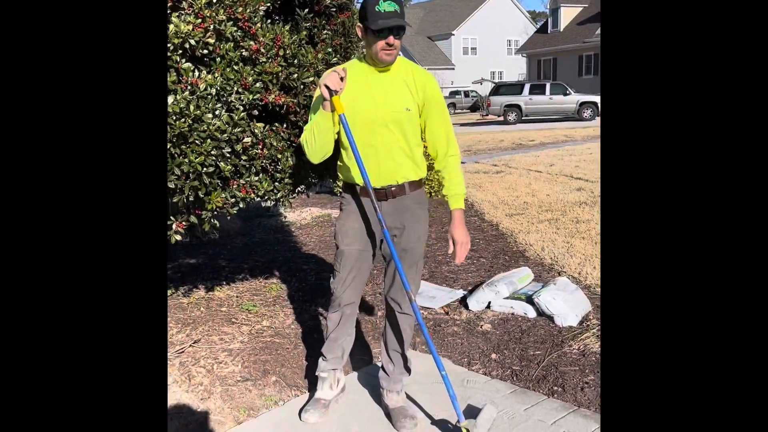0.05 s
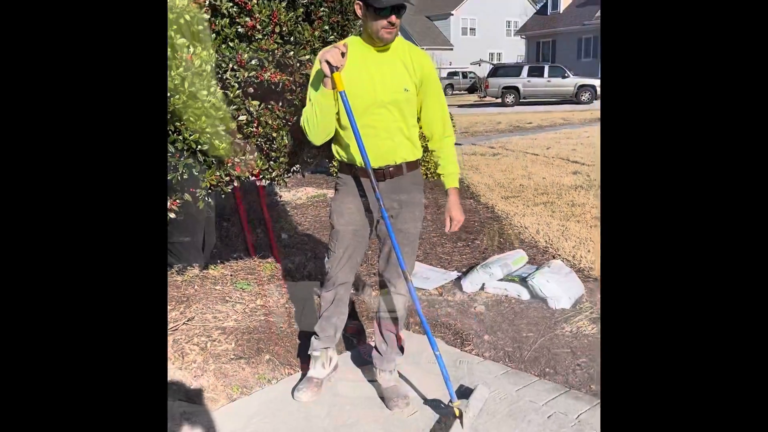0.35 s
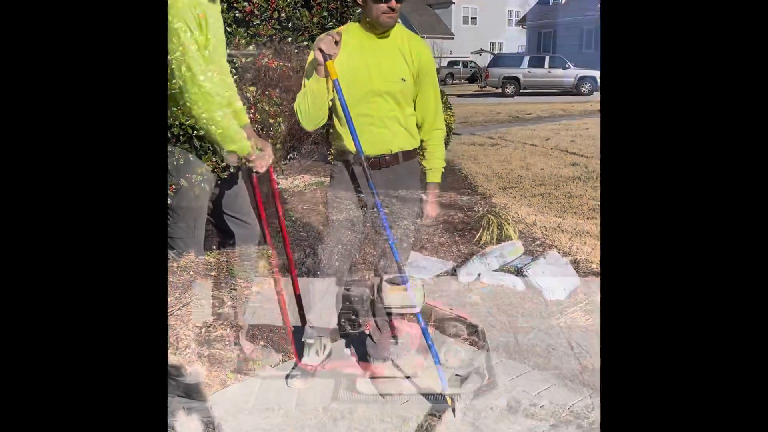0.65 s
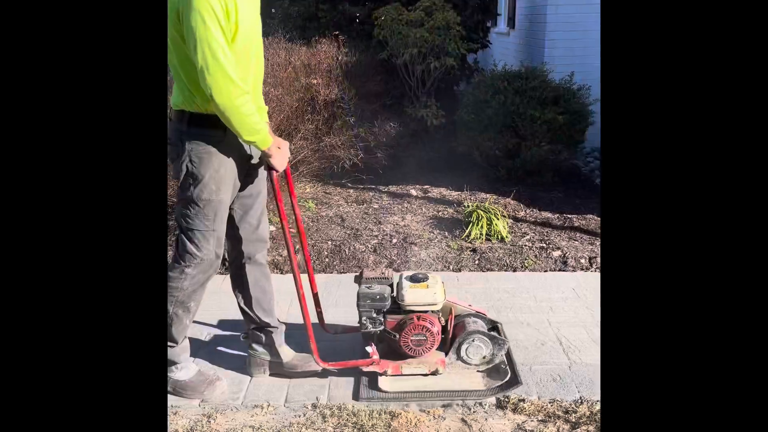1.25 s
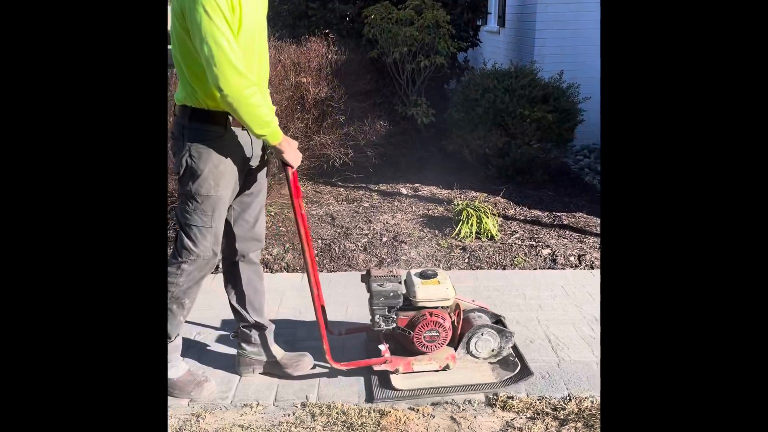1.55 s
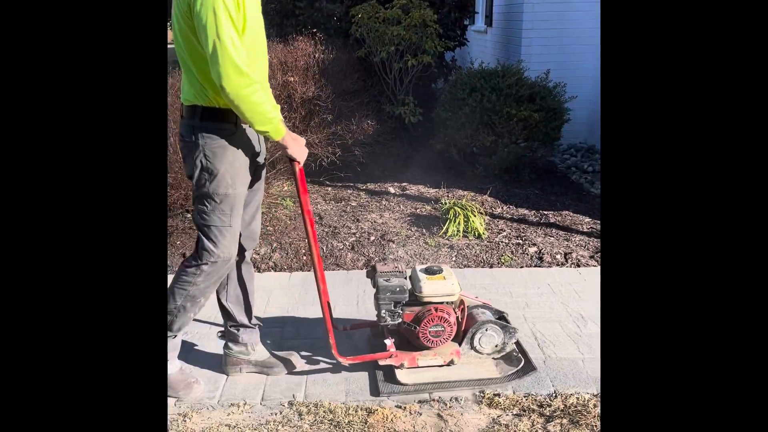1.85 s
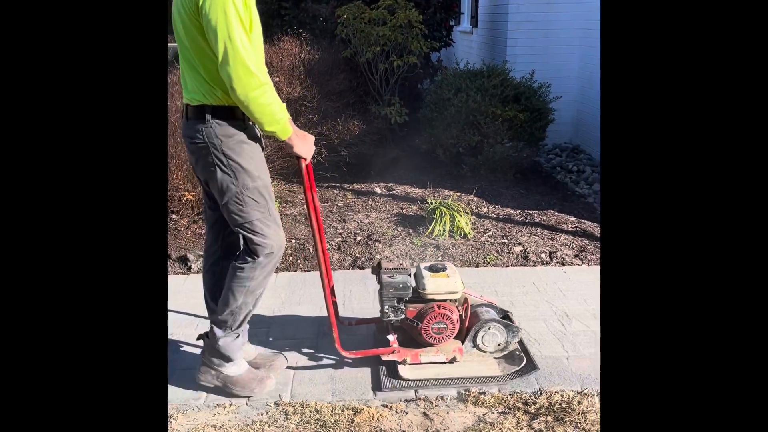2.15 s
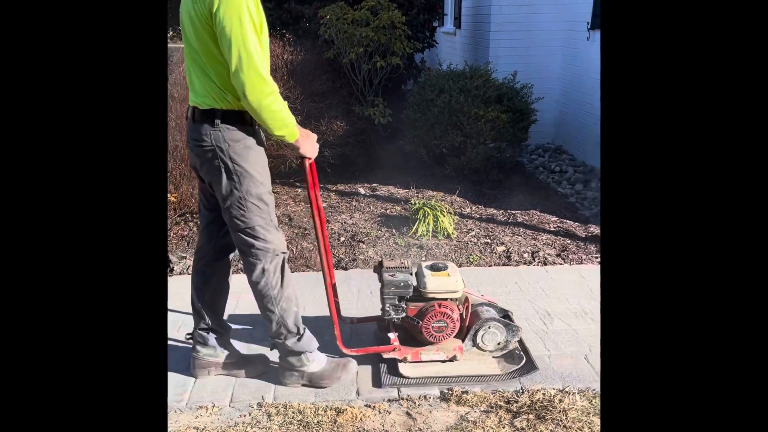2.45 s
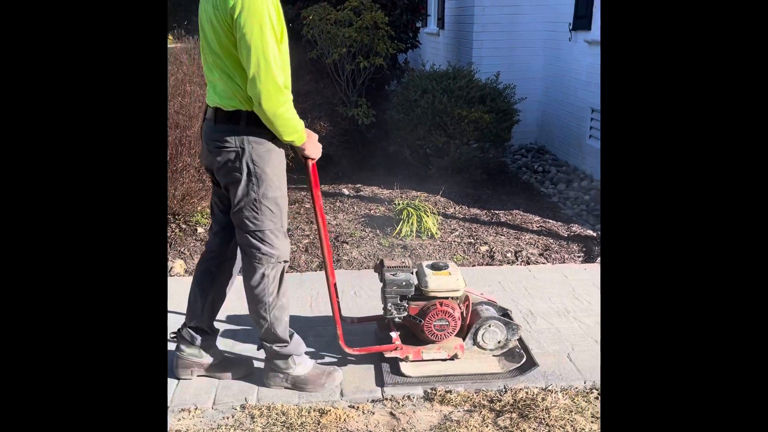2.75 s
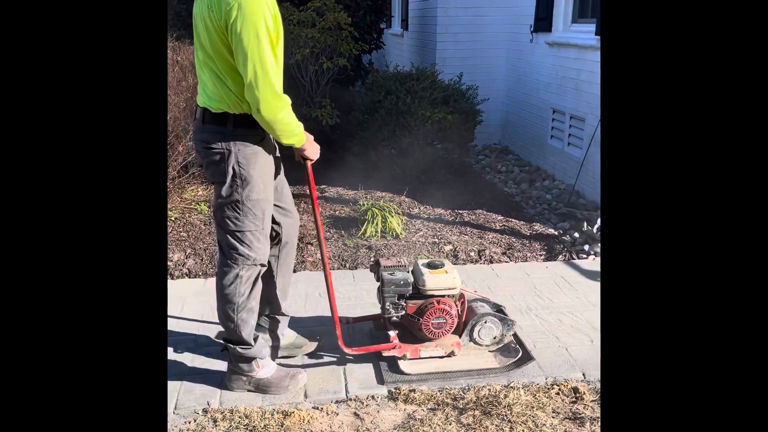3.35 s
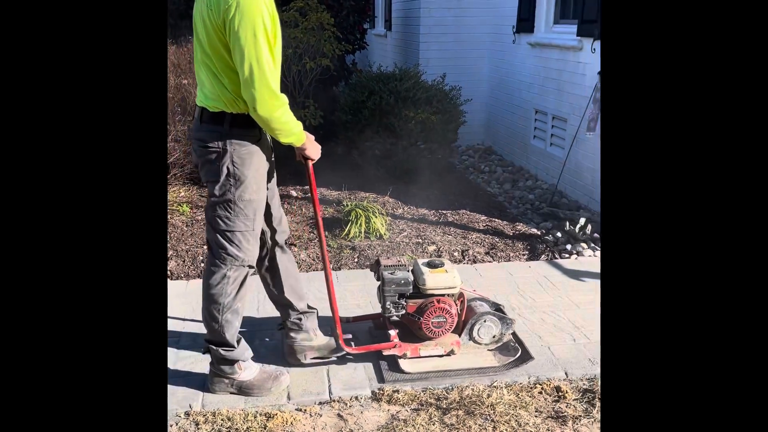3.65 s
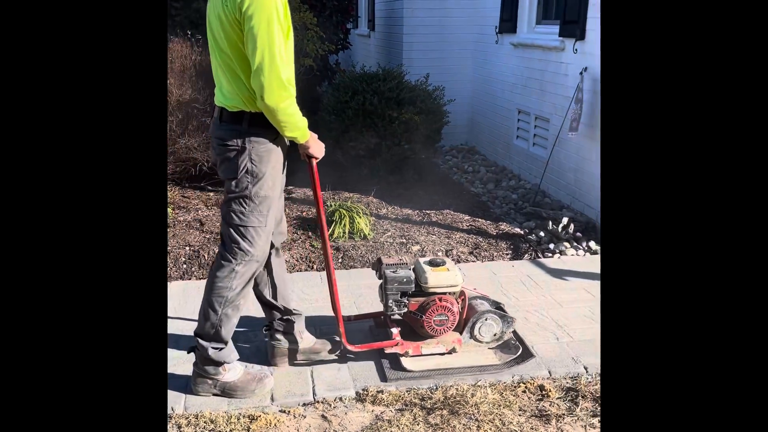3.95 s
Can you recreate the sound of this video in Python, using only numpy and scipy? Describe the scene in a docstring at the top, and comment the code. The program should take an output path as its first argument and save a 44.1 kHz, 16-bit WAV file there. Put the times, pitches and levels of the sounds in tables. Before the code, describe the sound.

A plate compactor pounds paving stones close to the microphone, swelling out of a brief, quiet outdoor rumble. The engine throbs and ticks under a fast, gritty clatter, with occasional knocks, cracking stones and growls over rough patches.

```python
"""A quiet garden rumbles, with a faint double tick and two soft bumps of air. From 0.2 to 1 s it fades
into a petrol plate compactor on paving, its one-cylinder four-stroke engine driving the plate by a belt.
The plate hums, rocks and slaps the stones in a pattern that repeats every two turns of its weight;
sand hisses under it and the engine ticks. Near 1 s stones crack and one edge knocks. It knocks again
near 1.8 s, growls over rough patches until 2.8 s, and knocks and cracks stones once more near 3.5 s."""
import sys
import numpy as np
from scipy import signal
from scipy.fft import rfft, irfft
from scipy.io import wavfile

SR = 44100
rng = np.random.default_rng(int(sys.argv[2]) if len(sys.argv) > 2 else 0)


def generate_wav(signal):
    """Clip the signal to [-1, 1] and save it as 16-bit WAV at the path in sys.argv[1]."""
    frames = np.transpose(np.atleast_2d(signal))
    scaled = np.clip(frames, -1, 1) * 32767
    pcm = np.round(scaled).astype(np.int16)
    wavfile.write(sys.argv[1], SR, pcm)


N = 176400
T = np.arange(N) / SR

# the garden's rumble (f/Hz, level/dB)
GARDEN_SPECTRUM = [(15, -24), (25, -5), (49, -4), (101, -2), (276, -14.5), (555, -19), (648, -23),
                   (797, -21.5), (1200, -33), (12000, -65.5), (15600, -101), (22000, -120)]
# low bumps of air (t/s, level/dB)
AIR_BUMPS = [(.278, -36), (.325, -36.5)]
# faint double tick in the garden (t/s, level/dB)
GARDEN_TICKS = [(.057, -53), (.069, -56)]
# bright tick shared by garden, valves and grit (f/Hz, level/dB)
TICK_SPECTRUM = [(800, -24), (1800, 9.5), (3200, -3), (4500, -2.5), (5600, -4.5), (8000, -11.5),
                 (13000, -9)]

# rocking rate; one cycle is two turns of the eccentric weight (t/s, f/Hz)
ROCKING_RATE = [(0.4, 40.2), (0.59, 40.0), (0.67, 39.6), (1.0, 39.4), (1.2, 39.6), (1.27, 40.1),
                (1.42, 40.0), (1.95, 40.1), (2.08, 39.8), (2.7, 39.4), (2.99, 40.1), (3.19, 40.1),
                (3.3, 39.8), (3.45, 39.7), (4.0, 40.2)]
# exhaust tones (multiple of the firing rate, level/dB)
EXHAUST_TONES = [(1, -69), (2, -40), (3, -39.5), (4, -49.5), (5, -31.5), (6, -31.5), (7, -36.5), (8, -40),
                 (9, -40), (10, -44.5), (11, -47.5), (12, -42.5), (14, -43)]
# swells and dips of single exhaust tones (multiple, t/s, half length/s, gain/dB)
EXHAUST_SWELLS = [(6, 0.6, 0.52, -8), (6, 3.2, .8, 2.5), (3, 0.6, .3, -6)]
# plate tones (multiple of the rocking rate, level/dB against its fader)
PLATE_TONES = [(1, -29), (2, -2), (3, 0), (4, -1), (5, 1), (6, 2.5), (7, -1.5), (8, -12.5), (9, -2.5),
               (10, -7), (11, -10.5), (12, -9), (13, -14), (14, -9.5), (15, -16), (16, -11.5), (17, -6.5),
               (18, -7), (19, -10), (20, -11), (22, -19)]
# hum faders; odd multiples grow with rocking (t/s, shaft tone/dB, fourfolds/dB, other evens/dB, odds/dB)
HUM_FADERS = [(.6, -40, -35.5, -38, -34.5), (1.02, -33, -31, -36, -36), (1.35, -34, -27, -39, -37.5),
              (1.85, -36, -28, -34, -46), (2.1, -34, -27, -31.5, -36.5), (2.28, -33, -24, -27.5, -37),
              (2.47, -27.5, -24.5, -29, -32.5), (2.7, -33, -25.5, -33.5, -31), (2.95, -33, -25.5, -33, -36),
              (3.12, -27, -25.5, -30.5, -31.5), (3.42, -26, -25.5, -29.5, -29),
              (3.62, -29, -23, -29, -31.5), (3.8, -27, -23.5, -28.5, -39), (4, -27, -23.5, -26.5, -40)]
# single plate tones swell or sink as the ground changes (multiple, t/s, half length/s, gain/dB)
PLATE_SWELLS = [(7, 3.15, 0.5, 5), (8, 1.8, 0.26, 7.5), (9, 2.7, 0.58, 5), (3, 1.1, 0.58, 3.5),
                (12, 0.66, 0.44, 10), (12, 1.94, 0.35, 4), (12, 2.46, 0.14, -19), (14, 1.84, 0.24, 12)]

# stones cracking under the plate (t/s, level/dB)
STONE_CRACKS = [(.868, -26), (.882, -27), (.907, -26), (.945, -21), (.972, -33), (1.024, -24), (1.075, -31),
                (2.477, -22), (3.457, -24), (3.533, -22), (3.577, -21), (3.628, -27), (3.653, -20.5),
                (3.703, -25), (3.729, -22), (3.754, -22)]
# their sharp snap (f/Hz, level/dB)
CRACK_SPECTRUM = [(800, -15), (1800, 5), (3000, 6.5), (4500, 1), (5600, -3), (8000, -5), (13000, -10)]
# growls on rough patches (t/s, half length/s, resonance f/Hz, level/dB)
ROUGH_PATCHES = [(1.887, .07, 580, -32.5), (2.12, 0.097, 665, -29), (2.663, .12, 600, -25.5),
                 (2.743, 0.051, 705, -25)]
# spells of edge knocking (peak t/s, half length/s, level/dB, decay/s)
KNOCK_SPELLS = [(1.011, .18, -32.5, .002), (1.835, .16, -33, .0015), (3.4575, .14, -29, .0008)]
# the edge's hard knock (f/Hz, level/dB)
KNOCK_SPECTRUM = [(300, -11.5), (900, -3), (1600, 6), (2200, -8.5), (3300, -7.5), (4500, -19), (8000, -40),
                  (13000, -40)]
# hiss of crushed sand (f/Hz, level/dB)
SAND_SPECTRUM = [(500, -4.5), (1800, 9.5), (3200, 0.5), (4200, -1.5), (5600, -2), (6800, -6.5), (8000, 3),
                 (10500, -1.5), (13000, -31)]
# modes of the plate and frame (f/Hz, width/Hz, level/dB)
STEEL_MODES = [(1708, 14, -37), (2236, 140, -47.5), (3272, 110, -47.5)]
# fader on those modes (t/s, gain/dB)
STEEL_FADER = [(.8, -4.5), (1.7, -2), (2.05, 1.5), (3.0, 0), (4.0, 1.5)]
# where the plate meets the paving (place in the cycle 0-1, thud and ring/dB, clack and crush/dB)
CONTACTS = [(0, 0.5, -5.5), (.07, 1, -7.5), (.15, -3, -4), (.33, -14.5, -3.5), (.52, 2.5, -2.5),
            (.60, -1.5, -2), (.72, -8.5, -4.5)]
# faders on the three layers of a slap (t/s, thud/dB, ring/dB, clack/dB)
SLAP_FADERS = [(0.76, -32.5, -32.5, -31), (0.94, -29, -27, -27), (1.2, -28, -26, -26.5),
               (1.52, -29.5, -30.5, -30.5), (1.66, -29, -27.5, -26), (1.9, -33, -25, -23.5),
               (2.0, -33, -30, -28), (2.13, -37, -22, -25), (2.33, -34, -30, -30.5),
               (2.45, -37, -24, -27.5), (2.56, -27.5, -26, -27), (2.76, -30.5, -24.5, -25),
               (2.95, -28, -28.5, -28), (3.12, -25.5, -26, -26.5), (3.45, -26, -26.5, -26.5),
               (3.6, -28, -27, -23.5), (3.72, -32, -26, -26), (4.0, -30, -24, -26.5)]
# low body of a slap (f/Hz, level/dB)
THUD_SPECTRUM = [(25, -46), (60, -18), (110, -6.5), (170, 0.5), (300, -3), (430, 0), (560, -14.5),
                 (900, -35)]
# its midrange ring (f/Hz, level/dB)
RING_SPECTRUM = [(300, -27), (450, -3.5), (600, 3), (760, -1.5), (900, -10.5), (1300, -32)]
# its stony attack (f/Hz, level/dB)
CLACK_SPECTRUM = [(500, -15.5), (900, 0), (1300, 4), (1550, -1), (1730, 0), (2050, -5.5), (2700, -9),
                  (3300, -16), (4100, -22), (5500, -31.5), (8000, -31), (13000, -63)]

# tone colour of both microphone ports (f/Hz, gain/dB)
PORT_EQ = [(20, 0), (7500, -0.5), (9000, -20.5), (10000, 14.5), (10800, 8), (11800, 0), (13000, -16)]
# how far left leads right (f/Hz, phase/rad)
LEFT_LEAD = [(20, 0), (1650, 0), (2100, 0.34), (2650, 2.02), (3200, 0.22), (3900, 0.15), (4800, 3),
             (5500, 6.5), (6100, 7.5), (7500, 8), (9000, 8.5), (10700, 10.5), (11900, 13)]
# left over right (f/Hz, level/dB)
LEFT_TILT = [(20, 0), (420, 0), (690, 2.5), (1130, 0.4), (1840, -2), (3000, 4), (4900, 1.5), (8000, -0.5)]
# diffuse sound that differs between the ports (f/Hz, level/dB)
STEREO_WIDTH = [(20, -43), (120, -58), (280, -34), (600, -34), (1400, -66), (2400, -11), (4000, -7),
                (5000, -8), (6000, -62), (7500, -27), (10500, -11.5), (12000, -28)]

FADE_START_S, FADE_END_S = 0.2, 1
FIRINGS_PER_CYCLE, CYCLE_START_S = .6412, 3.458
IN_STEP_S = 3.07  # exhaust and plate tones line up here, and the throb peaks
BUZZ_ORDER, BUZZ_DB_PER_S, BUZZ_ZERO_S = 17, 3.5, 3.64  # upper tones firm up as the plate settles
GARDEN_DB, VALVE_DB, SAND_DB = -43, -39, -36.5
GRIT_DB, GRIT_PER_S = -44.5, 70
THUD_TRIM_DB, RING_TRIM_DB, CLACK_DUCK_DB = -2, -4.5, -2
ECHO_DB, ECHO_T60_S, ECHO_MOD_HZ = -7.5, 0.094, 6
HIGH_CUT_HZ = 13500


def amp(db):
    """Decibels to gain."""
    return 10 ** (np.asarray(db) / 20)


def unit(x):
    """Scales to rms 1."""
    return x / np.sqrt(np.mean(x ** 2) + 1e-20)


def curve(rows, column=1):
    """One column of a time table as an automation curve."""
    rows = np.array(rows)
    return np.interp(T, rows[:, 0], rows[:, column])


def read(points, hz):
    """Reads a spectrum on a log-frequency axis."""
    f, value = np.transpose(points)
    return np.interp(np.log(hz + 1), np.log(f + 1), value)


def colour(x, points, size=4096):
    """Minimum-phase EQ with the given spectrum."""
    log_gain = np.log(amp(read(points, abs(np.fft.fftfreq(size, 1 / SR)))))
    taps = np.fft.ifft(np.exp(np.conj(signal.hilbert(log_gain)))).real[:size // 2]
    return signal.oaconvolve(x, taps)[:N]


def drift(rate_hz):
    """Slow random motion of rms 1."""
    hz = np.fft.rfftfreq(N, 1 / SR)
    return unit(irfft(rfft(rng.standard_normal(N)) / (1 + (hz / rate_hz) ** 4), N))


def bell(s, half_s):
    """A smooth swell of height 1 around a moment."""
    return np.exp(-((T - s) / half_s) ** 2)


def swells(rows, k):
    """The rise and fall in dB of tone k."""
    return sum(db * bell(s, half_s) for order, s, half_s, db in rows if order == k)


def since(cycles, s):
    """Counts cycles from a given moment."""
    return cycles - np.interp(s, T, cycles)


def strikes(cycles, place, jitter_s, spread_db):
    """One click of uneven strength and timing each time a cycle passes a place."""
    at = np.flatnonzero(np.diff(np.floor(cycles - place)) > 0)
    late, size = rng.standard_normal((N // 100, 2))[:len(at)].T
    at = np.clip(at + (late * jitter_s * SR).astype(int), 0, N - 1)
    out = np.zeros(N)
    out[at] = amp(spread_db * np.minimum(size, 2))
    return out


def bursts(clicks, decay_s):
    """Each click becomes a short dying puff of noise."""
    power = signal.lfilter([1], [1, -np.exp(-2 / (decay_s * SR))], clicks ** 2)
    return np.sqrt(power + 1e-20) * rng.standard_normal(N)


def struck(clicks, decay_s, loose):
    """A blow rings the same way each time, apart from a share of loose rattle."""
    t = T[:SR // 20]
    ring = signal.oaconvolve(clicks, rng.standard_normal(len(t)) * np.exp(-t / decay_s))[:N]
    return np.sqrt(1 - loose) * unit(ring) + np.sqrt(loose) * unit(bursts(clicks, decay_s))


def puffs(rows, spectrum, decay_s):
    """One-shots of coloured noise with a sharp attack."""
    envelope = sum(amp(db) * (T >= s) * np.exp(-abs(T - s) / decay_s) for s, db in rows)
    return envelope * unit(colour(rng.standard_normal(N), spectrum))


def ringing(blows, hz, width_hz):
    """One resonance, rung by the blows."""
    t = T[:SR // 10]
    mode = np.exp(-np.pi * width_hz * t) * np.sin(2 * np.pi * hz * t)
    return unit(signal.oaconvolve(blows, mode)[:N])


def garden():
    """A low outdoor bed with a faint double tick and two soft bumps of air."""
    bed = amp(GARDEN_DB) * unit(colour(rng.standard_normal(N), GARDEN_SPECTRUM))
    bumps = puffs(AIR_BUMPS, GARDEN_SPECTRUM, decay_s=0.037)
    return bed + bumps + puffs(GARDEN_TICKS, TICK_SPECTRUM, decay_s=0.0038)


def reflections(x):
    """A short diffuse echo, its colour kept moving so it stays smooth and does not ring."""
    t = T[:SR // 4]
    lfo_phase = 2 * np.pi * ECHO_MOD_HZ * T
    out = np.zeros(N)
    for send in np.cos(lfo_phase), np.sin(lfo_phase):
        tail = rng.standard_normal(len(t)) * amp(-60 * t / ECHO_T60_S) * (t > .004)
        out += signal.oaconvolve(x * send, tail / np.linalg.norm(tail))[:N]
    return out


def stereo_ports(x):
    """Two close microphone ports: alike in the bass, out of step in the treble."""
    size = 2 * N
    hz = np.fft.rfftfreq(size, 1 / SR)
    width = amp(read(STEREO_WIDTH, hz))
    mid, side = rfft(x, size), rfft(reflections(x), size) * width
    pan = np.exp(.5j * read(LEFT_LEAD, hz)) * amp(read(LEFT_TILT, hz) / 2)
    pair = np.array([(mid + side) * pan, (mid - side) / pan])
    return irfft(pair * amp(read(PORT_EQ, hz)) / np.hypot(1, width), size)[:, :N]


def valves(firings):
    """The valves give one rasping tick for each firing."""
    clicks = strikes(firings, place=.14, jitter_s=.0004, spread_db=2)
    return amp(VALVE_DB) * unit(colour(bursts(clicks, decay_s=.004), TICK_SPECTRUM))


def exhaust(firings, start_phases):
    """Exhaust tones, each beating with the nearest tone of the plate."""
    out = np.zeros(N)
    for k, db in EXHAUST_TONES:
        nearest = round(k * FIRINGS_PER_CYCLE)
        phase = 2 * np.pi * (k * firings + start_phases[nearest])
        out += amp(db + swells(EXHAUST_SWELLS, k) + 1.2 * drift(3.9)) * np.sqrt(2) * np.cos(phase)
    return out


def grit():
    """Grains snap at random under the plate; a few stones crack louder."""
    snaps = (rng.random(N) < GRIT_PER_S / SR) * amp(4.0 * np.minimum(rng.exponential(1, N), 2))
    crackle = amp(GRIT_DB) * unit(colour(bursts(snaps, decay_s=0.0014), TICK_SPECTRUM))
    return crackle + puffs(STONE_CRACKS, CRACK_SPECTRUM, decay_s=0.0017)


def sand(crush):
    """Sand hisses steadily under the plate and pulses as the blows crush it."""
    hiss = 0.38 * unit(crush) + rng.standard_normal(N)
    return amp(SAND_DB) * unit(colour(hiss, SAND_SPECTRUM))


def steel(blows):
    """The plate and frame ring at a few pitches under the blows."""
    modes = sum(amp(db) * ringing(blows, hz, width_hz) for hz, width_hz, db in STEEL_MODES)
    return amp(curve(STEEL_FADER)) * modes


def grinds(cycles, width_hz=126):
    """On a rough patch every turn of the weight scrapes the plate into a growl."""
    out = np.zeros(N)
    for s, half_s, hz, db in ROUGH_PATCHES:
        hits = strikes(2 * cycles, place=0, jitter_s=.0005, spread_db=1)
        scrapes = struck(hits, decay_s=0.0032, loose=0.68)
        out += amp(db) * bell(s, half_s) * ringing(ringing(scrapes, hz, width_hz), hz, width_hz)
    return out


def edge_knocks(cycles):
    """One edge lands squarely on the stone once a cycle: sharp knocks that swell and die away."""
    out = np.zeros(N)
    for s, half_s, db, decay_s in KNOCK_SPELLS:
        hits = strikes(since(cycles, s), place=0, jitter_s=.0001, spread_db=1)
        knocks = struck(hits, decay_s, loose=0.44)
        out += amp(db) * bell(s, half_s) * unit(colour(knocks, KNOCK_SPECTRUM))
    return out


def plate_hum(cycles, start_phases, wander_db=1.43, wander_rad=0.037):
    """Low tones of the shaking plate, each wavering as the ground changes."""
    shaft, fourfold, even, odd = (curve(HUM_FADERS, column) for column in (1, 2, 3, 4))
    out = np.zeros(N)
    for k, db in PLATE_TONES:
        fader = odd if k % 2 else shaft if k == 2 else even if k % 4 else fourfold
        buzz = (k >= BUZZ_ORDER) * BUZZ_DB_PER_S * (T - BUZZ_ZERO_S)
        phase = 2 * np.pi * (k * cycles + start_phases[k]) + k * wander_rad * drift(4.9)
        level = db + fader + buzz + swells(PLATE_SWELLS, k) + wander_db * drift(6)
        out += amp(level) * np.sqrt(2) * np.cos(phase)
    return out


def plate_slaps(cycles):
    """Each contact layers a thud, a short ring and a stone clack, crushes sand and rings the steel."""
    thud, ring, clack, crush = np.zeros((4, N))
    for place, thud_db, clack_db in CONTACTS:
        hits = strikes(cycles + .01 * drift(1.5), place, jitter_s=.0002, spread_db=.7)
        hits *= amp(0.77 * drift(3.5))
        thud += amp(thud_db) * struck(hits, decay_s=0.0046, loose=0.8)
        ring += amp(thud_db) * struck(hits, decay_s=0.0015, loose=0.59)
        clack += amp(clack_db) * struck(hits, decay_s=.0014, loose=.6)
        crush += amp(clack_db) * bursts(hits, decay_s=0.005)
    # the clacks duck while an edge is knocking
    duck_db = CLACK_DUCK_DB * sum(bell(s, half_s) for s, half_s, _, _ in KNOCK_SPELLS)
    return (amp(curve(SLAP_FADERS, 1) + THUD_TRIM_DB) * unit(colour(thud, THUD_SPECTRUM))
            + amp(curve(SLAP_FADERS, 2) + RING_TRIM_DB) * unit(colour(ring, RING_SPECTRUM))
            + amp(curve(SLAP_FADERS, 3) + duck_db) * unit(colour(clack, CLACK_SPECTRUM))
            + sand(crush) + steel(crush))


def scene():
    """The garden crossfades into the running machine."""
    cycles = since(np.cumsum(curve(ROCKING_RATE)) / SR, CYCLE_START_S)
    in_step = since(cycles, IN_STEP_S)
    start_phases = rng.random(len(PLATE_TONES) * 2)
    drone = plate_hum(in_step, start_phases) + exhaust(in_step * FIRINGS_PER_CYCLE, start_phases)
    clatter = plate_slaps(cycles) + edge_knocks(cycles) + grinds(cycles) + grit()
    machine = drone + valves(cycles * FIRINGS_PER_CYCLE) + clatter + amp(ECHO_DB) * reflections(clatter)
    fade = np.clip((T - FADE_START_S) / (FADE_END_S - FADE_START_S), 0, 1)
    return stereo_ports(fade * machine + (1 - fade) * garden())


def record(dry):
    """A steep high cut on the whole mix."""
    taps = signal.firwin(511, HIGH_CUT_HZ, window=("kaiser", 9), fs=SR)
    return signal.oaconvolve(dry, taps[None], "same")


dry = scene()
out = record(dry)
generate_wav(out)
```